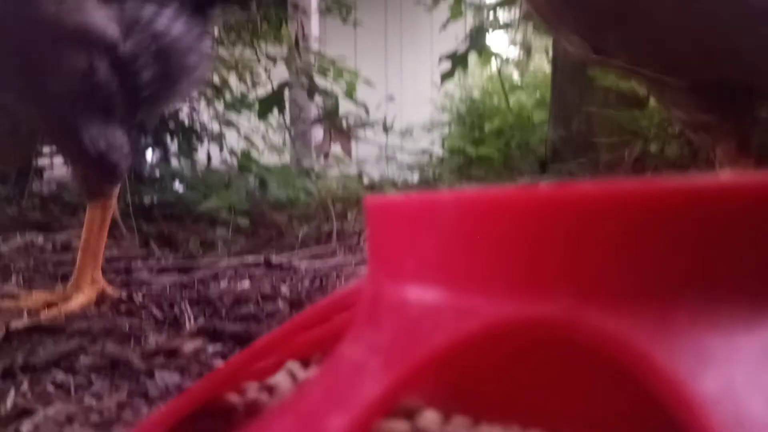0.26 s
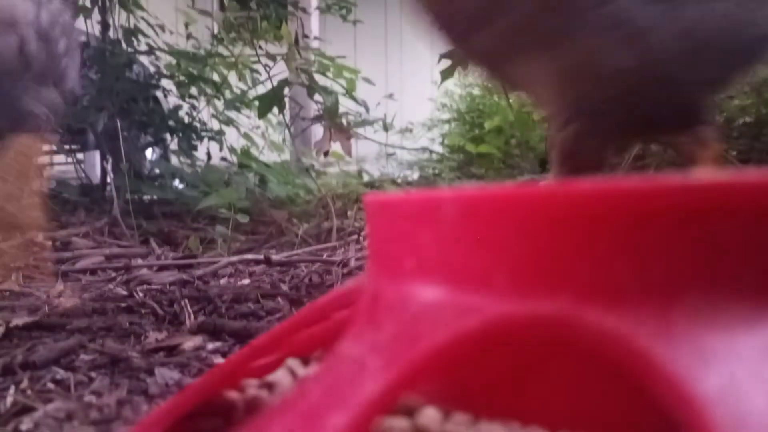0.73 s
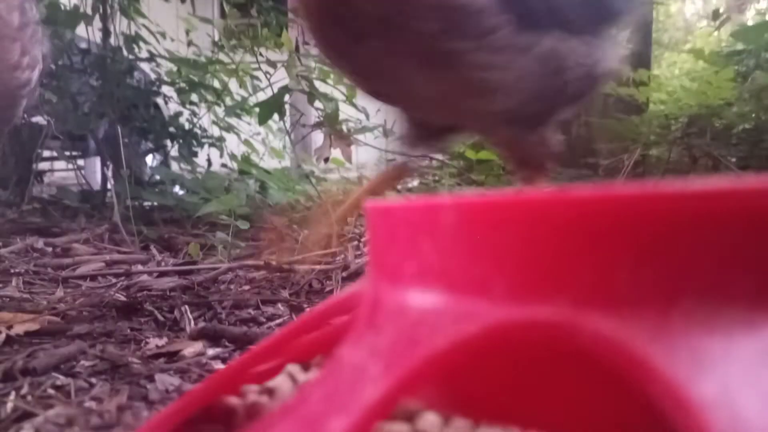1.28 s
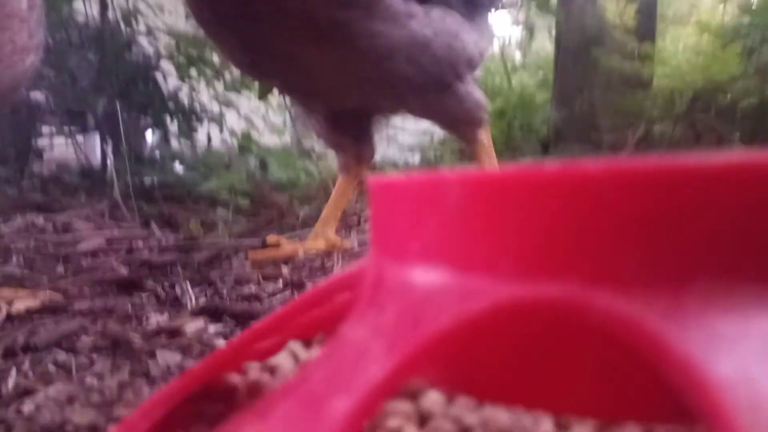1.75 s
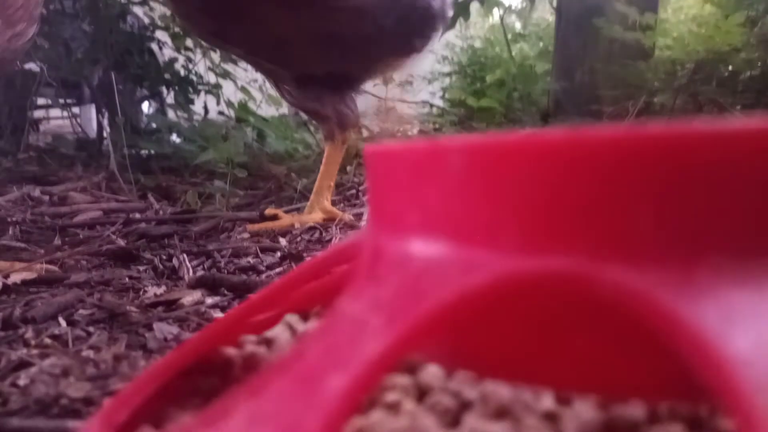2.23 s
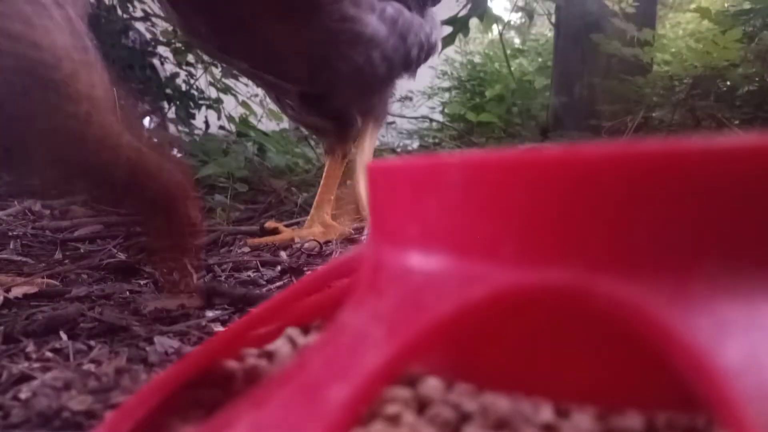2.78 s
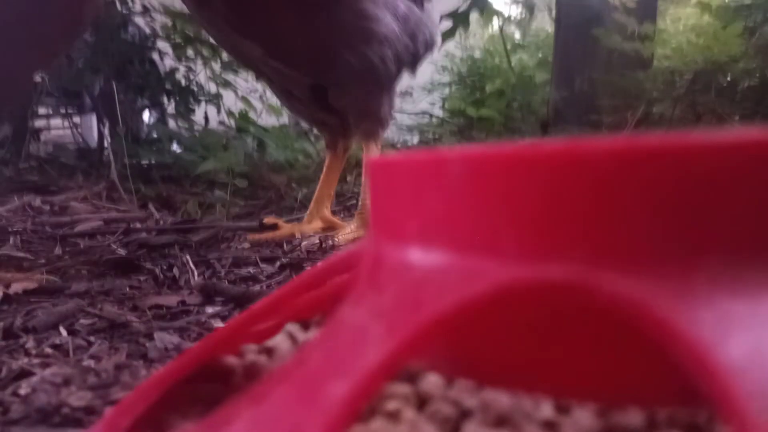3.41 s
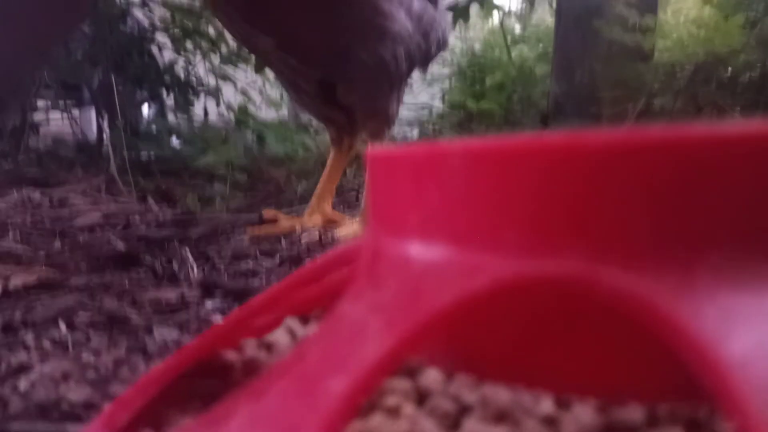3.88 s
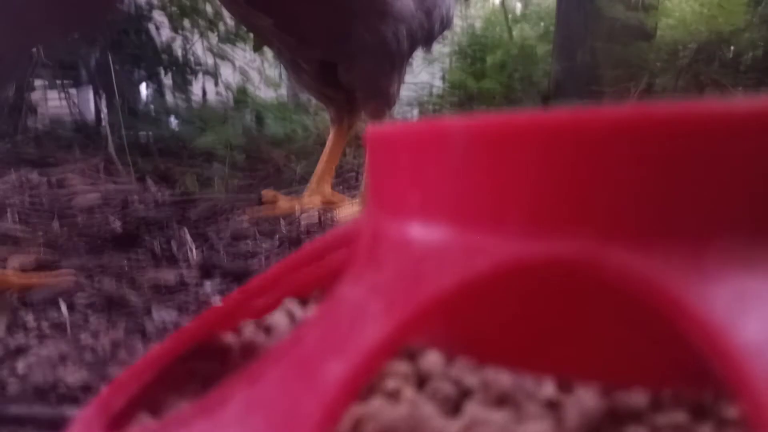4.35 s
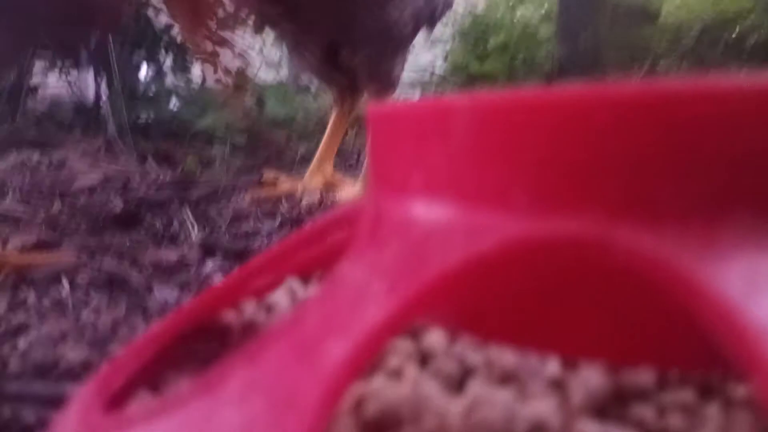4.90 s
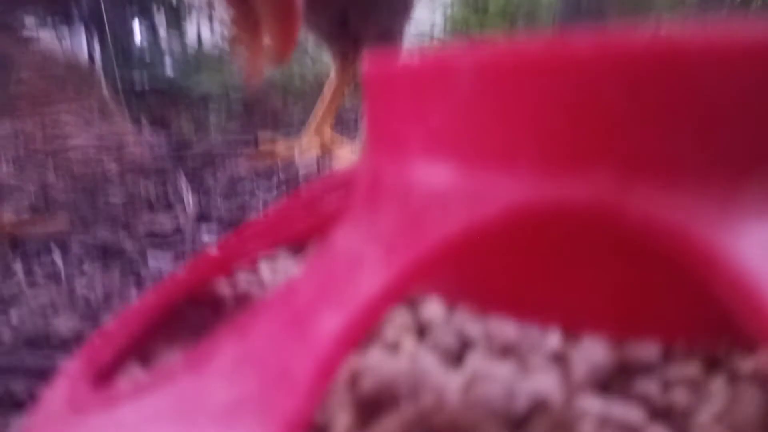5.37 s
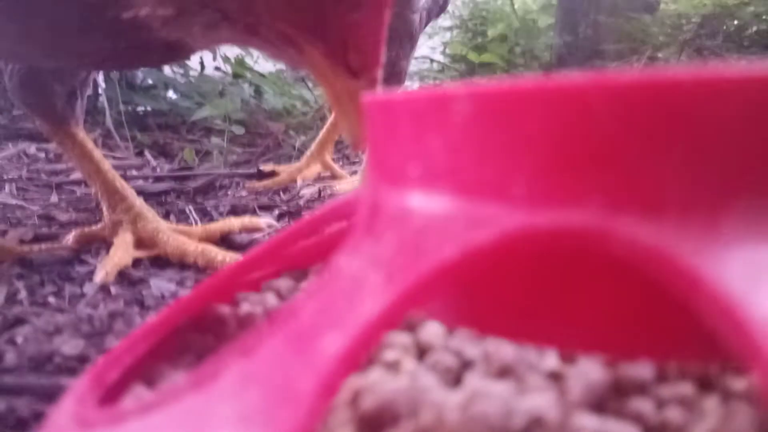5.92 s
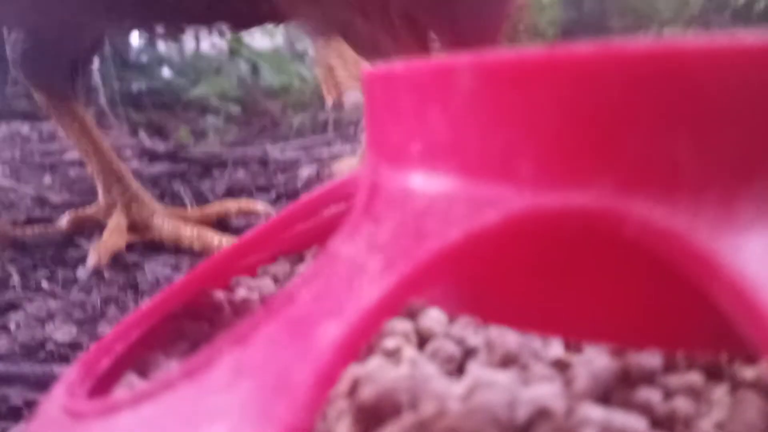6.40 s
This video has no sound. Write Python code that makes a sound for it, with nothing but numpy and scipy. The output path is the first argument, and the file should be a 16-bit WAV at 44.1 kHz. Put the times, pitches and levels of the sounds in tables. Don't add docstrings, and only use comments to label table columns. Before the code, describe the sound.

Beaks tap and scrape at a plastic feeder while a distant hen croons thinly, then a close hen grunts and lets out one long squawk over cicada hiss.

```python
import sys
import numpy as np
from scipy import signal
from scipy.fft import rfft, irfft
from scipy.io import wavfile

SR = 44100
rng = np.random.default_rng(int(sys.argv[2]) if len(sys.argv) > 2 else 0)


def dump_mix(stems):
    frames = np.atleast_2d(stems).T
    limited = np.clip(frames, -1, 1)
    pcm = np.round(limited * 32767).astype(np.int16)
    wavfile.write(sys.argv[1], SR, pcm)


def volts(x):
    e = np.asarray(x, float) / 20
    return 10 ** e


N = 292824
TIME = np.arange(N) / SR

# frequency in Hz, level in dB.
SQUAWK_THROAT = [(150, 0), (300, 14.5), (600, 14), (900, 3), (1200, 8), (1500, -11.5), (1800, -10.5),
                 (2100, -17), (2400, -24.5), (2700, -34), (3300, -50), (4000, -36), (4300, -20),
                 (4800, -60)]
# frequency in Hz, level in dB.
RASP_THROAT = [(150, 10), (300, 7), (450, 8), (600, 8), (750, 28.5), (900, 10), (1050, 10), (1350, 15),
               (1650, 4), (2000, -10), (2500, -14), (3200, -68)]


def rms_one(x):
    return x / np.sqrt(np.mean(x ** 2) + 1e-20)


def at_hz(points, hz):
    point_hz, level_db = np.transpose(points)
    octave = np.log2(np.maximum(hz, 1))
    below = np.maximum(np.log2(point_hz[0]) - octave, 0)
    above = np.maximum(octave - np.log2(point_hz[-1]), 0)
    return np.interp(octave, np.log2(point_hz), level_db) - 60 * (below + above)


def drift(rate, size=N):
    r = np.exp(-40 * np.pi * rate / SR)
    chance = rng.standard_normal(size // 20 + 2002)
    slow = signal.lfilter([1], [1, -2 * r, r * r], chance)[2000:]
    return np.interp(np.arange(size) / 20, np.arange(len(slow)), rms_one(slow))


def hiss(spectrum, patchy_db, flicker):
    hz = np.fft.rfftfreq(N, 1 / SR)
    shaped = rfft(rng.standard_normal(N)) * volts(np.maximum(at_hz(spectrum, hz), -150))
    band = np.floor(3 * np.log2(np.clip(hz, spectrum[0][0], spectrum[-1][0])))
    total = np.zeros(N)
    for b in np.unique(band):
        total += irfft(shaped * (band == b), N) * volts(patchy_db * drift(flicker))
    return rms_one(total)


def level_over_time(points):
    return volts(np.interp(TIME, *np.transpose(points)))


def traffic():
    # frequency in Hz, level in dB.
    rumble = [(15, -66), (25, -68), (59, -5), (102, 0.5), (150, -0.5), (182, -6.5), (216, -3), (259, -46.5),
              (300, -29), (320, -21.5), (420, -33.5), (700, -120)]
    return volts(-54) * hiss(rumble, patchy_db=3.2, flicker=4)


def yard_murmur():
    # frequency in Hz, level in dB per Hz.
    colour = [(150, -5), (260, 9), (307, -2.5), (374, -8), (420, 0), (506, -5.5), (628, -2), (706, -8),
              (902, 1), (1210, -12), (2310, -20.5), (2700, -28), (3510, -63), (5940, -120)]
    # time in seconds, level in dB.
    loudness = [
        (0, -59.5),
        (.4, -65.5),
        (1.5, -65.5),
        (2.7, -70.5),
        (3.5, -67),
        (4.8, -67.5),
        (6.64, -64.5),
    ]
    return level_over_time(loudness) * hiss(colour, patchy_db=1.8, flicker=5)


def cicadas():
    # frequency in Hz, level in dB.
    colour = [(2400, -35), (2800, -31), (3500, -19), (4700, -16), (6000, -9.5), (6700, -6.5), (7100, 1.5),
              (7500, -7), (8000, -20.5), (8900, -25), (9300, -18), (9700, -26), (10900, -22.5),
              (11900, -32)]
    # time in seconds, level in dB.
    loudness = [
        (0, -43.5),
        (.44, -48.5),
        (1.5, -49),
        (3.4, -51),
        (4.5, -51),
        (5.8, -48),
        (6.64, -48),
    ]
    breathing = volts(.6 * drift(4.5))
    return level_over_time(loudness) * breathing * hiss(colour, patchy_db=1, flicker=27)


def treetops():
    # frequency in Hz, level in dB.
    leaf_colour = [(11000, 3), (11800, -3), (13000, 2), (14200, -7), (15800, 7), (15900, -30)]
    # frequency in Hz, level in dB.
    insect_colour = [(13300, -30), (14000, -10), (14500, -3), (15200, 0), (15800, -1), (15900, -40)]
    swell_s, rise_s = 4.94, .5
    swell = .5 + .5 * np.tanh((TIME - swell_s) / rise_s)
    gusts_db = 2.1 * (1 - swell) * drift(1.5)
    leaves = volts(-79.5 + 14.5 * swell + gusts_db) * hiss(leaf_colour, patchy_db=1.2, flicker=20)
    insects = volts(-70 + 13 * swell + gusts_db) * hiss(insect_colour, patchy_db=1.2, flicker=40)
    return leaves + insects


def katydid():
    # frequency in Hz, level in dB.
    colour = [(10000, -40), (10700, -15), (12500, -17), (13800, -13), (14600, -5), (15300, 0), (15800, 1),
              (15900, -40)]
    # time in seconds, peak level in dB.
    chirps = [(3.24, -51), (3.318, -51), (3.41, -47), (3.5, -47), (3.592, -47), (3.668, -48), (3.757, -47),
              (3.837, -46), (3.927, -46), (4.02, -47), (4.115, -46), (4.211, -47), (4.311, -48)]
    fade_s, low_fade_s = .046, .046 * .7
    buzz = hiss(colour, patchy_db=1.5, flicker=150)
    stroke_hz = 125 + 15 * drift(20)
    buzz = buzz * (1 + .5 * np.sin(2 * np.pi * np.cumsum(stroke_hz) / SR))
    low = signal.sosfilt(signal.butter(4, 14200, fs=SR, output="sos"), buzz)
    out = np.zeros(N)
    for s, peak_db in chirps:
        t = np.maximum(TIME - s + .007, 0)
        high_part = (1 - np.exp(-t / .0036)) * np.exp(-(t / fade_s) ** 2)
        low_part = (1 - np.exp(-t / .012)) * np.exp(-(t / low_fade_s) ** 2)
        out += volts(peak_db - 9.5) * ((buzz - low) * high_part + low * low_part)
    return out


def tap(knock_db, knock_hz, snap_db, rattle_ms, tick_db):
    # ratio to the knock pitch, level in dB, cycles to fade by 60 dB.
    wall_modes = [
        (.45, -6, 14),
        (.8, -20, 14),
        (1.0, 14, 13.5),
        (1.25, 1, 17.0),
    ]
    # frequency in Hz, seconds to fade by 60 dB.
    snap_modes = [(3100, .004), (3800, .004), (4800, .003), (5900, .0025), (7000, .0025)]
    # frequency in Hz, seconds to fade by 60 dB.
    tick_modes = [(8800, .0015), (10300, .002), (11800, .0015), (13200, .0012), (14800, .0015)]
    t = np.arange(2000) / SR
    contact = rng.standard_normal(2000) * (rng.random(2000) < .2) * np.exp(-t * 1000 / rattle_ms)
    contact[0] = 1
    if knock_hz > 4000:
        wall_modes = wall_modes[1:]
    wall = [(ratio * knock_hz, db, cycles / ratio / knock_hz) for ratio, db, cycles in wall_modes]
    snap, tick = [[(hz * rng.uniform(.9, 1.04), rng.normal(0, 3), t60) for hz, t60 in modes]
                  for modes in (snap_modes, tick_modes)]
    tick_db = tick_db + .66 * snap_db
    out = np.zeros(2000)
    for modes, peak_db in ((wall, knock_db), (snap, knock_db + snap_db), (tick, knock_db + tick_db)):
        ring = sum(volts(db - 60 * t / t60) * np.sin(2 * np.pi * hz * t) for hz, db, t60 in modes)
        ring *= 1 - np.exp(-t / .0002)
        hit = signal.fftconvolve(contact, ring)[:2000]
        out += volts(peak_db - 1.5) * hit / np.abs(hit).max()
    return out


def pecks():
    # time in seconds, wall knock in dB, knock pitch in Hz, snap over knock in dB.
    taps = [(0.0044, -46, 1640, 0), (0.2976, -70, 1770, 23), (0.7344, -70, 1740, 17),
            (0.9283, -74, 1810, 23), (1.059, -43, 1870, -26), (1.3372, -48, 1575, 12),
            (1.415, -47, 1770, -4), (1.43, -47, 2100, -2), (1.4875, -42, 2050, -7), (1.53, -59, 2560, 8),
            (1.979, -33, 1400, 3), (2.0123, -41, 1660, -16), (2.0484, -45, 1850, -10),
            (2.0966, -52, 1760, -4), (2.1123, -39.5, 1680, 2), (2.2009, -62, 1510, 18),
            (2.804, -44, 1850, -26)]
    close_taps = [(1.982, -26, 4700, -8), (5.2, -33, 1920, -3), (5.207, -35.5, 2130, 11),
                  (5.212, -39, 2200, 3), (6.043, -30.5, 2300, 5.5), (6.057, -26, 1375, -15),
                  (6.061, -29.5, 2040, 8.5), (6.064, -26.5, 1570, -9), (6.119, -50, 2050, 12),
                  (6.344, -27, 2040, 6), (6.352, -35, 1560, 7), (6.356, -34, 1290, 3), (6.36, -30, 2240, 3),
                  (6.367, -41, 1540, 1), (6.388, -51, 1490, 9)]
    scrapes = [
        (1.9944, -46, 1790, 10),
        (2.8938, -44.5, 1890, 0),
        (5.191, -38, 2300, 8),
        (5.623, -37, 2093, 8),
        (6.038, -41, 2003, 2),
        (6.047, -32.5, 1490, -7),
        (6.074, -44, 2000, 4),
        (6.089, -38.5, 1370, -13),
    ]
    rustles = [
        (1.32, -56, 1690, 10),
        (1.99, -42, 1900, 1),
        (3.93, -55, 2140, -10),
        (3.98, -59, 2300, -10),
    ]
    tip_clicks = [
        (2.4694, -52, 11000, -10),
        (3.1494, -64, 11000, -8),
        (3.922, -42, 10500, -16),
        (3.985, -42, 10800, -16),
    ]
    bill_snaps = [
        (5.1018, -25, 15300, -50),
        (5.1021, -25, 7300, -40),
    ]
    lone_ticks = [(.0927, -50, 10500, -8), (2.0, -44, 10800, -8), (2.8085, -49, 11800, -4),
                  (2.8935, -43, 10800, -8), (2.8937, -45, 14500, -8), (2.904, -50, 3400, -8),
                  (2.9005, -48, 1900, -8), (1.9835, -32, 5200, -2), (5.192, -42, 10000, -4),
                  (5.2008, -27, 6000, -12), (5.2075, -34, 11000, -3), (5.21, -36, 10500, -3),
                  (5.308, -43, 10500, -2), (5.318, -40, 10500, -4), (6.044, -31, 3600, -3),
                  (6.062, -31, 6200, -4), (6.351, -28, 10500, -2)]
    # rows, length of the rattle in ms, tick over knock in dB
    kinds = ((taps, 2.4, -9), (close_taps, 2, -15), (scrapes, 6.2, -14), (rustles, 18, -7),
             (tip_clicks, 2, -2.9), (bill_snaps, .2, -9), (lone_ticks, .2, -9))
    out = np.zeros(N + 2000)
    for rows, rattle_ms, tick_db in kinds:
        for s, knock_db, knock_hz, snap_db in rows:
            start = round(s * SR)
            out[start:start + 2000] += tap(knock_db, knock_hz, snap_db, rattle_ms, tick_db)
    return out[:N]


def crunch():
    # start in seconds, length in seconds, level in dB.
    crunches = [
        (1.327, 0.034, -63),
        (.001, .025, -57),
        (3.92, .02, -66),
        (3.985, .03, -67),
        (5.618, .01, -46),
        (6.039, .027, -47),
        (6.343, 0.018, -39),
    ]
    grit = rng.standard_normal(N) * (.4 + (rng.random(N) < .1))
    grit = rms_one(signal.sosfilt(signal.butter(2, [890, 4600], "band", fs=SR, output="sos"), grit))
    gain = np.zeros(N)
    for s, length, level_db in crunches:
        after = np.maximum(TIME - s - length, 0)
        fade = np.exp(-after / .0038) + volts(-22) * np.exp(-after / .051)
        gain += volts(level_db) * (TIME > s) * fade
    return grit * gain


def span(rows):
    s, *columns = np.transpose(rows)
    start = round(s[0] * SR)
    t = TIME[start:round(s[-1] * SR)]
    fade = np.clip(np.minimum(t - s[0], s[-1] - t) / .004, 0, 1)
    return start, fade, [np.interp(t, s, c) for c in columns]


def envelope(start, length, attack, release):
    edge_db = 21.5
    squeeze = min(length / (attack + release + .002), 1)
    corners = np.array([0, attack * squeeze, length - release * squeeze, length])
    return start + corners, np.array([-edge_db, 0, 0, -edge_db])


def croon(hz, level_db, strain):
    octave_db = -16 + 20 * strain
    hoarse = .033 + (.3 - .033) * np.maximum(strain, 0) ** 2
    phase = 2 * np.pi * np.cumsum(hz * (1 + .0098 * drift(32, len(hz)))) / SR
    overtones = np.sin(2 * phase) + 3.5 * hoarse ** 2 * np.sin(3 * phase)
    tone = np.sin(phase) + volts(octave_db) * overtones
    flutter = 3.95 * np.clip(hoarse, 0, 1) * np.tanh(drift(75, len(hz)))
    throb = 2.2 * hoarse * np.sin(.27 * phase)
    return np.sqrt(2) * volts(level_db) * tone * (1 + flutter + throb)


def far_hen():
    # time in seconds, pitch in Hz, level in dB, strain from 0 to 1.
    croons = [
        [(.275, 560, -54, 0.5), (.38, 585, -63, 0.6), (.44, 579, -58, 0.46), (.496, 578, -49, 0.13),
         (.674, 593, -51, 0.26), (.765, 596, -70, .4), (.815, 623, -48.5, .15), (.875, 640, -75, .2)],
        [(1.015, 582, -68, .1), (1.062, 584, -45.5, 0), (1.292, 599, -48, 0.13), (1.316, 549, -50, .6),
         (1.38, 575, -45.5, 0.24), (1.458, 592, -45.5, 0.07), (1.476, 618, -62, 0.5), (1.51, 600, -66, 0.5)],
        [(1.7, 610, -67, .1), (1.756, 585, -51.5, 0.33), (1.9, 596, -52, 0.4), (1.94, 620, -43, .1)],
    ]
    clucks = [
        [(2.265, 625, -68, 0), (2.298, 549, -52, .55), (2.316, 544, -48, .75), (2.348, 545, -54, .9),
         (2.362, 590, -56, .2), (2.382, 621, -55, -.2), (2.396, 651, -62, -.5), (2.446, 638, -56, -.9)],
        [(2.446, 638, -56, -.9), (2.512, 607, -55.5, -.9), (2.53, 611, -59, .4), (2.548, 582, -56, .85),
         (2.574, 590, -53, .75), (2.586, 605, -61, .1), (2.604, 582, -55, -.2), (2.65, 600, -70, -.2)],
    ]
    # start in seconds, length in seconds, pitch in Hz, level in dB, strain.
    yelps = [
        (4.82, 0.078, 795, -56, -.6),
        (.121, .026, 690, -42, 0.6),
        (.68, .12, 1197, -57, -.9),
        (.3, .3, 485, -69, -.3),
    ]
    tails = [
        (1.98, .11, 600, -51, .3),
        (6.0, 0.041, 292, -36.5, -.9),
    ]
    calls = croons + [clucks[0] + clucks[1][1:]]
    # rows, attack in s, release in s, glide in Hz per s
    for notes, attack, release, glide in ((yelps, .025, .025, 1.5), (tails, .0049, .19, 250)):
        for begin, length, pitch_hz, peak_db, strain in notes:
            s, shape_db = envelope(begin, length, attack, release)
            pitch = pitch_hz + glide * (s - begin)
            calls = calls + [np.transpose([s, pitch, peak_db + shape_db, strain + 0 * s])]
    out = np.zeros(N)
    for rows in calls:
        start, fade, (hz, level_db, strain) = span(rows)
        out[start:start + len(hz)] += croon(hz, level_db, strain) * fade
    return out


def throat(x, spectrum, flat_below=300):
    size = 4096
    hz = np.maximum(np.fft.rfftfreq(size, 1 / SR), flat_below)
    cepstrum = irfft(np.log(volts(np.maximum(at_hz(spectrum, hz), -90))))
    cepstrum[1:size // 2] *= 2
    cepstrum[size // 2 + 1:] = 0
    response = irfft(np.exp(rfft(cepstrum)))[:size // 2]
    return signal.fftconvolve(x, response)[:len(x)]


def near_call(rows, even_throat, pattern_throat):
    start, fade, (hz, even_db, pattern_db, rough) = span(rows)
    rough = np.clip(rough, 0, 1)
    luck = rng.standard_normal((400, 2))
    plain = np.cumsum(hz) / SR
    limp = .062 * np.minimum(volts(pattern_db - even_db), 1) * np.cos(np.pi * plain)
    cycles = plain + limp + .2 * rough * np.interp(plain, np.arange(400), luck[:, 0])
    pulses = sum(np.cos(2 * np.pi * k * cycles) for k in range(1, 19))
    which = np.round(cycles).astype(int) % 400
    chance = np.minimum(rough / .4, 1)
    strong_weak = .7 + (-1.) ** which
    pattern = (1 - chance) * strong_weak + chance * (1 + .25 * luck[which, 1])
    even = rms_one(throat(pulses, even_throat)) * volts(even_db)
    rasp = rms_one(throat(pulses * pattern, pattern_throat, flat_below=208)) * volts(pattern_db)
    return np.pad((even + rasp) * fade, (start, N - start - len(fade)))


def short_calls(calls, even_throat, pattern_throat, attack, release, even_db, pattern_db, rough):
    out = np.zeros(N)
    for start, length, hz, glide, level_db in calls:
        s, shape_db = envelope(start, length, attack, release)
        call_db = level_db + shape_db
        rows = [s, hz + glide * (s - start), call_db + even_db, call_db + pattern_db, rough + 0 * s]
        out += near_call(np.transpose(rows), even_throat, pattern_throat)
    return out


def murmur():
    # frequency in Hz, level in dB.
    murmur_throat = [(160, -41), (280, 10), (333, -6.5), (482, 3), (646, -1.5), (802, -11), (1350, -3),
                     (1660, -6.5), (1880, -25), (2200, -28), (2860, -30), (4840, -120)]
    # time in seconds, pulse rate in Hz, level in dB.
    breath = [
        (.166, 335, -60),
        (.177, 322, -43),
        (.205, 326, -44),
        (.232, 346, -42),
        (.255, 350, -43),
        (.268, 343, -50),
        (.283, 330, -62),
    ]
    # frequency in Hz, level in dB.
    cluck_throat = [(150, -33), (250, 4.5), (653, 2.5), (990, -15), (1240, -13), (1570, -8), (1940, -11.5),
                    (2250, -21), (2530, -37), (2820, -30), (3200, -43), (4160, -64), (7040, -120)]
    # start in seconds, length in seconds, pulse rate in Hz, glide in Hz per second, level in dB.
    pips = [
        (.14, .013, 318, 5, -41),
        (.153, .013, 320, 5, -39),
    ]
    clucks = [
        (1.923, .058, 329, -220, -29.5),
    ]
    rows = [(s, hz, db, db - 17, .1) for s, hz, db in breath]
    return (near_call(rows, murmur_throat, RASP_THROAT)
            + short_calls(pips, murmur_throat, RASP_THROAT, attack=.006, release=.005,
                          even_db=0, pattern_db=-8, rough=.3)
            + short_calls(clucks, cluck_throat, RASP_THROAT, attack=.016, release=.014,
                          even_db=0, pattern_db=-32, rough=.035))


def grunt_and_growl():
    # frequency in Hz, level in dB.
    grunt_throat = [(150, -28), (300, -6), (500, -9), (740, 2), (900, 0), (1200, -9), (1400, -22),
                    (1700, -32), (2000, -32), (2300, -52), (3200, -70)]
    # frequency in Hz, level in dB.
    snarl_throat = [(150, -20), (300, 0), (450, -5), (750, 0), (1050, -9), (1200, -18), (1400, -9),
                    (1800, -14), (1950, -25), (2300, -30), (2550, -41), (3200, -60)]
    # start in seconds, length in seconds, pulse rate in Hz, glide in Hz per second, level in dB.
    grunts = [
        (4.912, .075, 284, -440, -28.5),
        (4.98, .1, 263, 90, -58),
    ]
    growls = [
        (5.108, .094, 271, 160, -34.5),
    ]
    return (short_calls(grunts, SQUAWK_THROAT, grunt_throat, attack=.027, release=.022,
                        even_db=-16, pattern_db=0, rough=.5)
            + short_calls(growls, snarl_throat, snarl_throat, attack=.009, release=.013,
                          even_db=-3.6, pattern_db=0, rough=.42))


def paired(rows):
    # frequency in Hz, level in dB.
    first_throat = [(150, -11), (300, 0), (450, -3), (600, 3.3), (800, 1.7), (1000, .7), (1200, -20),
                    (1450, -16.5), (1750, -34), (2050, -39), (2500, -56), (3200, -66)]
    # frequency in Hz, level in dB.
    open_throat = [(150, -7), (300, 3), (450, -1), (600, -1.6), (800, -16), (1000, -22), (1200, -7.6),
                   (1450, -4.4), (1750, -13.7), (2050, -26), (2500, -34.5), (3200, -55)]
    # frequency in Hz, level in dB.
    closed_throat = [(150, -13.5), (300, 3), (450, -2), (600, .8), (800, -6.4), (1000, -15), (1200, -7.5),
                     (1450, -3.5), (1750, -25), (2050, -25), (2500, -36), (3200, -59)]
    closing_s, closing_takes_s = 5.31, .035
    gap_early, gap_late = .404, .449
    start, fade, (hz, level_db, share) = span(rows)
    closing = .5 + .5 * np.tanh((TIME[start:start + len(hz)] - closing_s) / closing_takes_s)
    shift = .5 - gap_early - (gap_late - gap_early) * closing
    plain = np.cumsum(hz) / SR + .006 * drift(120, len(hz))
    first, second = [sum(np.cos(np.pi * k * cycles) for k in range(1, 25))
                     for cycles in (plain - shift, plain - 1 + shift)]
    voice = throat(first, first_throat, 150)
    voice = voice + (1 - closing) * throat(second, open_throat, 150)
    voice = voice + closing * throat(second, closed_throat, 150)
    return np.pad(rms_one(voice) * volts(level_db + 1.2) * share * fade, (start, N - start - len(fade)))


def squawk():
    # time in seconds, pulse rate in Hz, effort in dB.
    breath = [
        (5.185, 284, -33.5),
        (5.356, 293.8, -29.5),
        (5.418, 300.5, -28.5),
        (5.452, 294.5, -28),
        (5.666, 295.6, -27.5),
        (5.738, 300.2, -25.5),
        (5.984, 307.2, -22.5),
        (6.0, 293.4, -26.5),
        (6.012, 293, -48),
    ]
    # time in seconds, level in dB, width in seconds.
    slips = [
        (5.542, -44, .007),
        (5.56, -55, .02),
        (5.7, -46, .018),
        (5.745, -44, .016),
        (5.778, -47, 0.008),
        (5.91, -47, .012),
        (5.96, -54, .02),
    ]
    doubled_until_s, break_s = 5.44, 5.994
    at, hz, effort_db = np.transpose(breath)
    s = np.arange(at[0], at[-1], .004)
    hz, effort_db = np.interp(s, at, hz), np.interp(s, at, effort_db)
    pairs = np.clip((doubled_until_s - s) / .018, 0, 1)
    pattern = volts(-64)
    for when, level_db, width in slips:
        pattern = pattern + volts(level_db) * np.exp(-((s - when) / width) ** 2)
    settled_db = 20 * np.log10(1.001 - pairs)
    pattern_db = 20 * np.log10(pattern) + settled_db
    rough = .015 + .24 * (s > break_s)
    rows = np.transpose([s, hz, effort_db + settled_db, pattern_db, rough])
    even = near_call(rows, SQUAWK_THROAT, RASP_THROAT)
    upper = signal.sosfiltfilt(signal.butter(3, 2150, "high", fs=SR, output="sos"), even)
    sag_db = 9 * np.clip(TIME - doubled_until_s, 0, 1)
    even = even + upper * (volts(2.5 * drift(14) - sag_db) - 1)
    return even + paired(np.transpose([s, hz, effort_db, pairs]))


def near_hen():
    return murmur() + grunt_and_growl() + squawk()


def scene():
    # delay in seconds, level in dB.
    reflections = [
        (.011, -24),
        (.027, -27),
        (.052, -30),
    ]
    air = traffic() + yard_murmur() + cicadas() + treetops()
    hens = pecks() + crunch() + far_hen() + near_hen()
    dull = signal.lfilter([.3], [1, -.7], hens)
    echoes = sum(volts(db) * np.pad(dull, (round(s * SR), 0))[:N] for s, db in reflections)
    return (air + katydid() + hens + echoes)[None]


def top_cut(x):
    return signal.sosfilt(signal.butter(12, 16980, fs=SR, output="sos"), x)


def record(dry):
    cut = signal.sosfilt(signal.cheby2(12, 70, 16900, fs=SR, output="sos"), dry)
    return top_cut(cut)


dry = scene()
out = record(dry)
dump_mix(out)
```